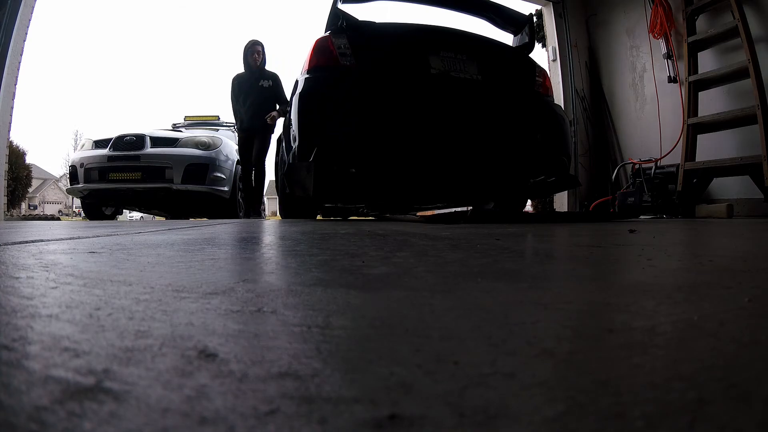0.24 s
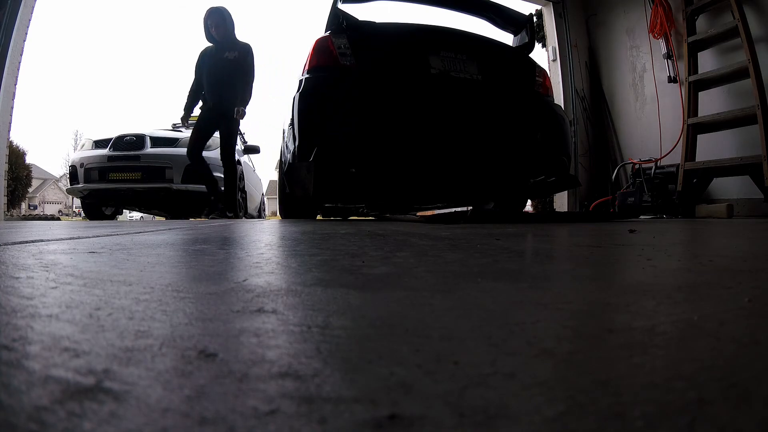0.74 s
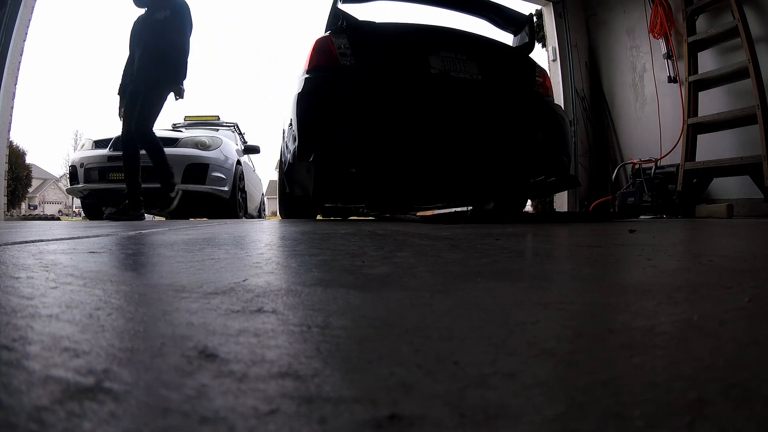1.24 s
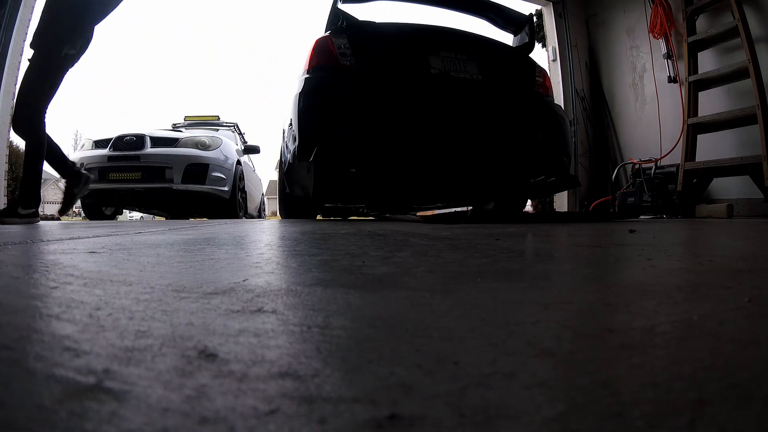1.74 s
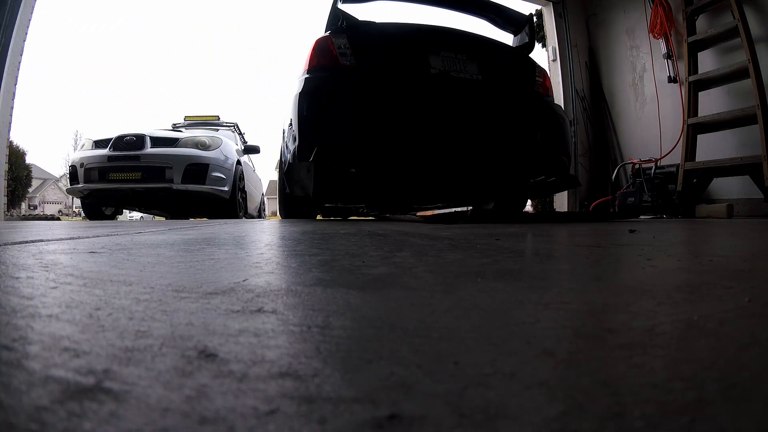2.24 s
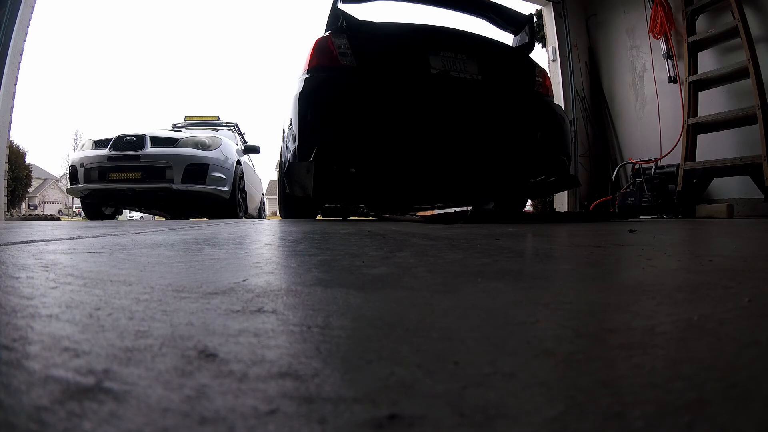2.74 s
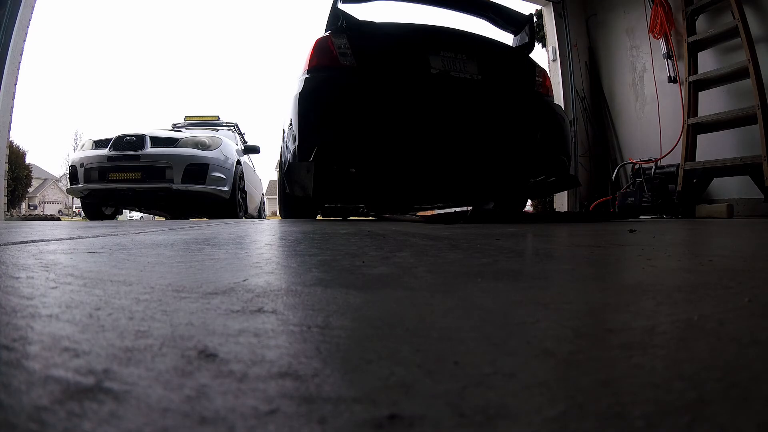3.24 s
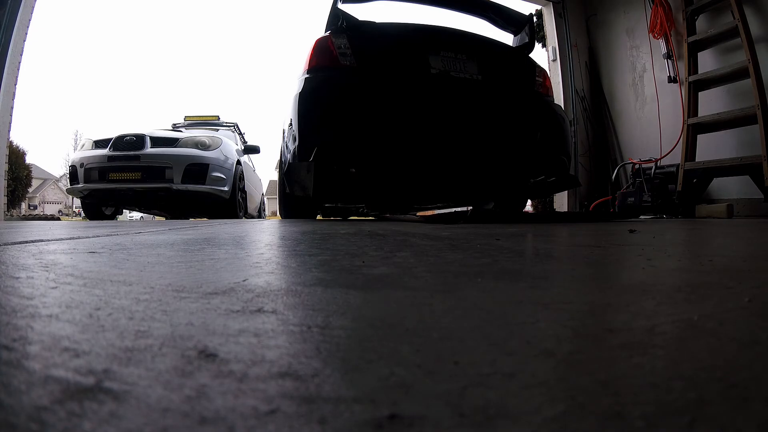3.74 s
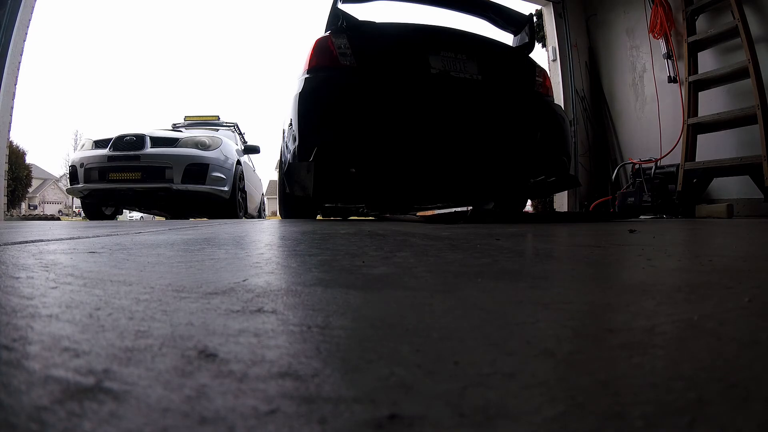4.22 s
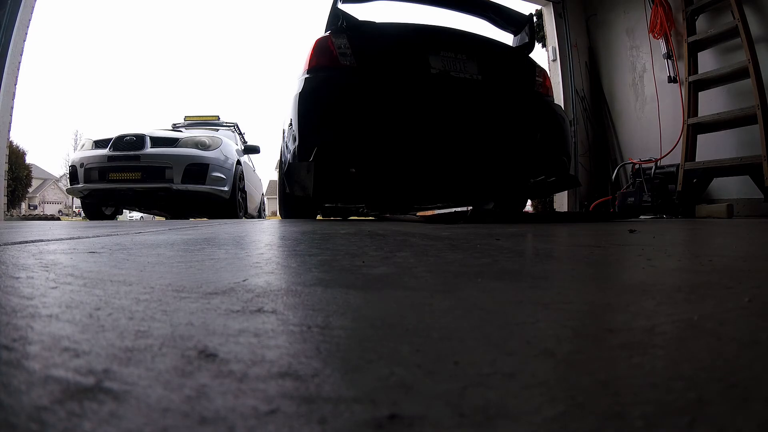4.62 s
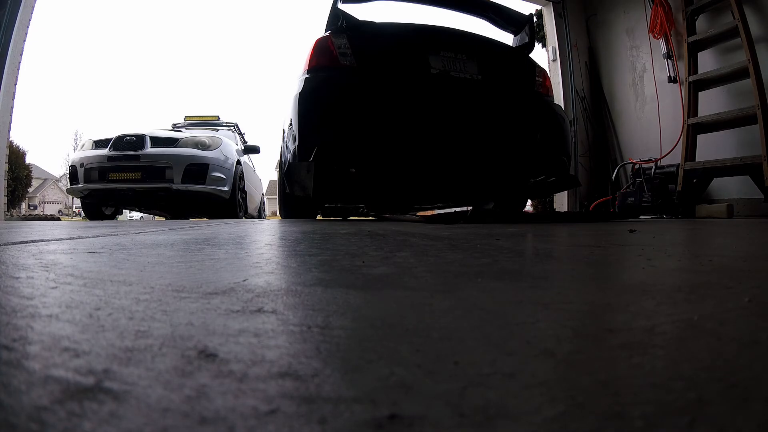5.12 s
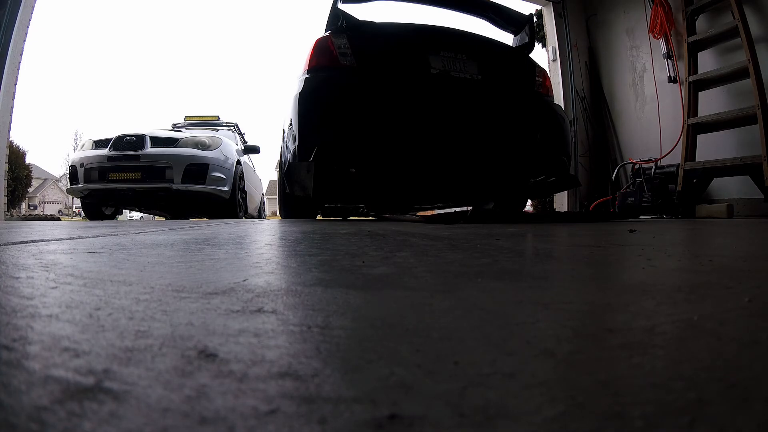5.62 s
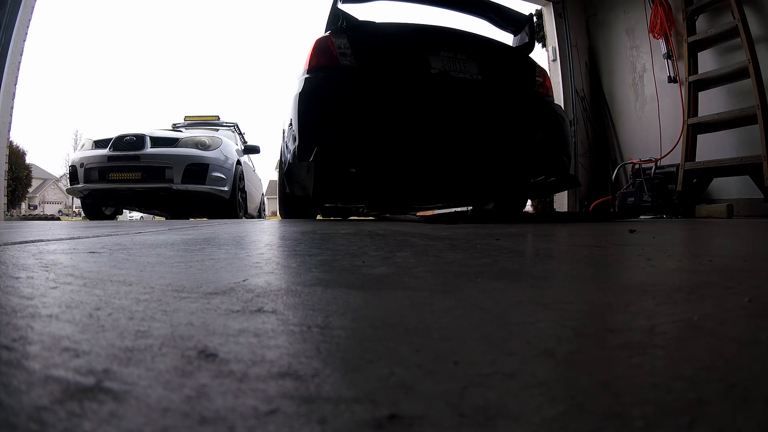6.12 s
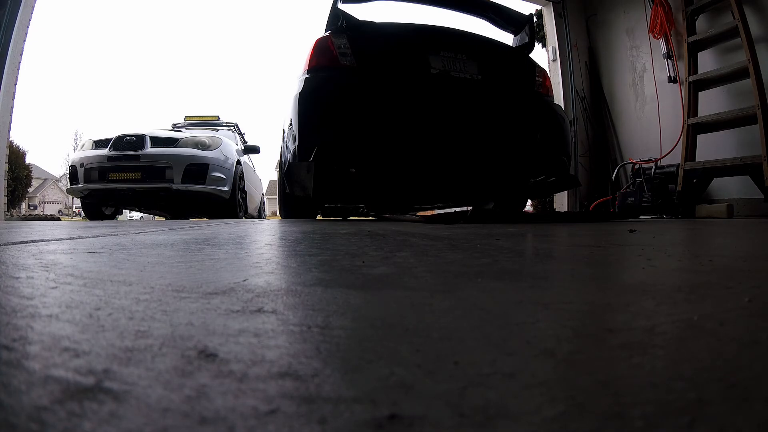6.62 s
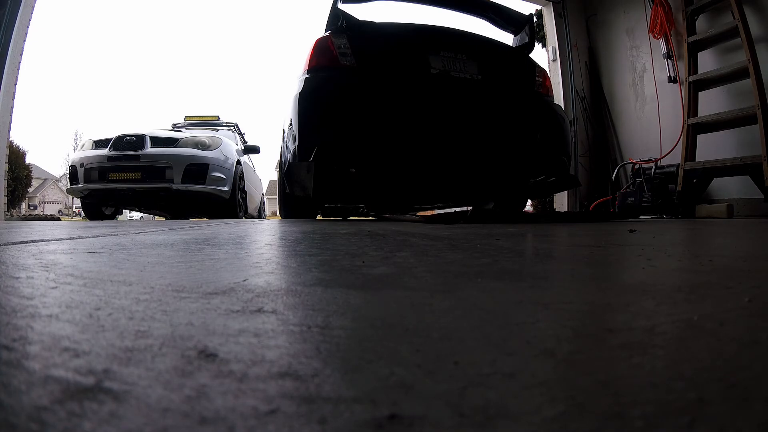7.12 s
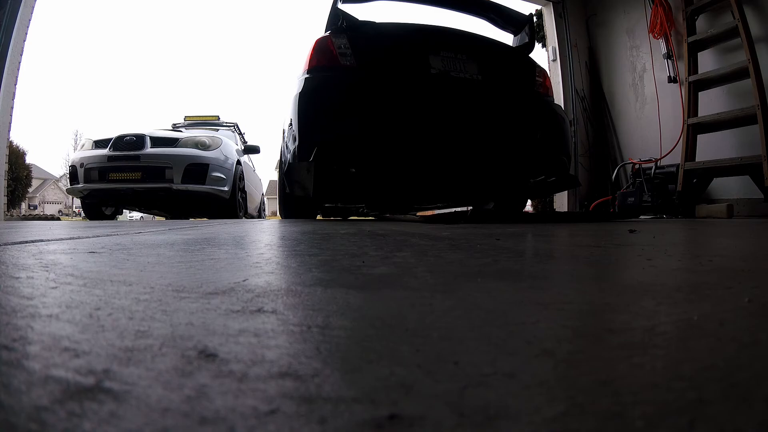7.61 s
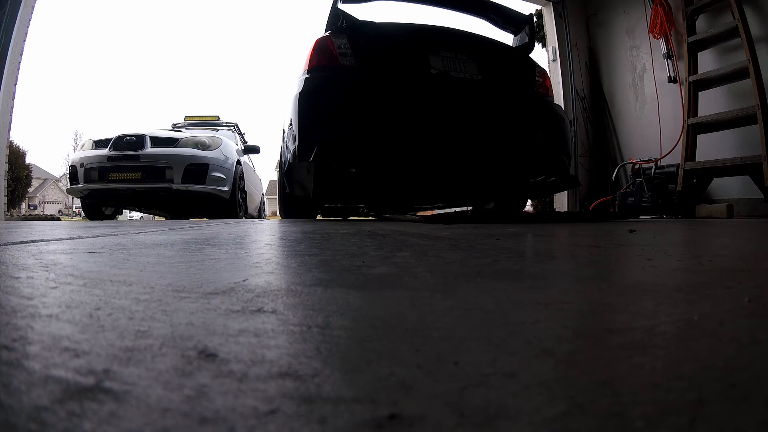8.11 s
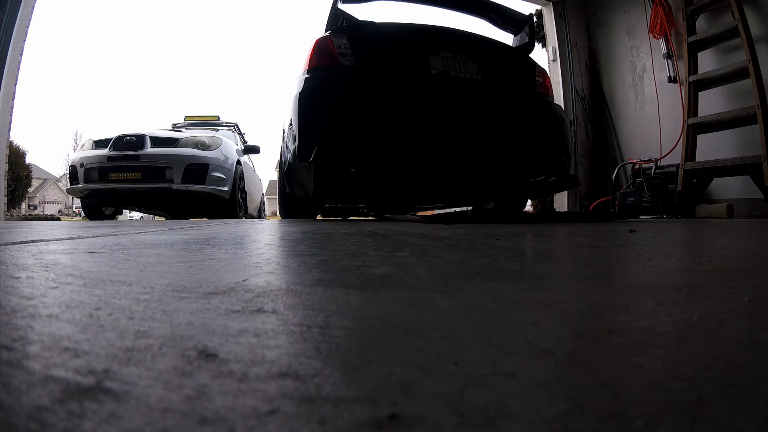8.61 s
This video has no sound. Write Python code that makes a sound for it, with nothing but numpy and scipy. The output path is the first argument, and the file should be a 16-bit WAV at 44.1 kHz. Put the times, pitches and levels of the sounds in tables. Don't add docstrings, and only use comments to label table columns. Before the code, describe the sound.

A turbocharged car idles loudly through an open straight exhaust in a concrete garage, deep, lumpy and booming, with raspy puffs and faint ticking.

```python
import sys
import numpy as np
from scipy import signal
from scipy.fft import rfft, irfft, next_fast_len
from scipy.io import wavfile
from scipy.ndimage import uniform_filter1d, minimum_filter1d

SR = 44100
rng = np.random.default_rng(int(sys.argv[2]) if len(sys.argv) > 2 else 0)


def generate_wav(signal):
    frames = np.transpose(np.atleast_2d(signal))
    scaled = np.clip(frames, -1, 1) * 32767
    pcm = np.round(scaled).astype(np.int16)
    wavfile.write(sys.argv[1], SR, pcm)


def elevation(decibels):
    levels = np.asarray(decibels, float)
    return 10 ** (levels / 20)


N = 390726
RUN_IN = 22050

# (time [s], full engine cycles per second [Hz])
ENGINE_SPEED = [(0.0, 12.798), (0.68, 12.869), (1.36, 12.92), (2.04, 13.016), (2.73, 13.053), (3.41, 13.12),
                (4.09, 13.17), (4.77, 13.188), (5.45, 13.217), (6.13, 13.216), (6.82, 13.263),
                (7.5, 13.375), (8.18, 13.391), (8.86, 13.378)]
FIRING_ORDER = [
    (0.4133, 1.0),
    (0.6637, 1.06),
    (0.8384, 1.0),
    (0.0878, 0.81),
]
# (time [share of the cycle], level [dB])
TAILPIPE_PUFFS = [
    (0.119, 0.5),
    (0.388, -1.5),
    (0.629, -6),
    (0.871, -3.5),
]
# (time [share of the cycle], level [dB])
VALVE_TICKS = [
    (.17, 0),
    (0.429, 0.5),
    (.68, -2),
    (0.929, 3.5),
]

# (frequency [Hz], width [Hz], signed drive under load, just unloaded, warmed up [amplitude])
PIPE_ONE_MODES = [(28.7, 7.0, 0.001, 0.1029, 0.0125), (147.9, 4.0, -0.0686, -0.0603, -0.0177),
                  (257.0, 20.9, 0.2464, 0.1469, 0.1045), (275.9, 4.5, 0.0441, 0.0206, -0.019),
                  (300.4, 4.0, 0.0256, 0.0021, 0.0337), (305.5, 4.7, -0.0338, -0.0655, -0.0131),
                  (310.7, 5.4, -0.0723, -0.0229, -0.0043), (336.2, 4.0, -0.013, 0.212, 0.0103),
                  (363.1, 23.4, -0.0757, -0.0747, -0.0999), (501.3, 8.2, -0.0022, -0.02, -0.0351),
                  (581.2, 4.0, -0.0013, -0.0124, -0.0008), (697.5, 4.1, 0.0104, -0.0076, 0.009),
                  (711.4, 4.3, -0.0038, -0.004, 0.0018), (752.7, 45.9, -0.0232, -0.026, 0.0184)]
# (frequency [Hz], width [Hz], signed drive under load, just unloaded, warmed up [amplitude])
PIPE_TWO_MODES = [(59.6, 5.9, 0.0574, 0.0504, 0.0371), (152.4, 4.0, 0.0014, -0.0798, -0.2115),
                  (162.6, 4.9, 0.18, 0.1956, 0.1105), (198.3, 6.1, -0.0462, -0.0878, -0.019),
                  (219.2, 5.6, 0.0125, 0.0089, 0.0303), (264.7, 6.3, -0.0601, -0.0572, 0.0569),
                  (312.8, 8.7, 0.0209, 0.112, -0.0521), (413.8, 16.5, -0.0774, 0.0245, 0.0526),
                  (456.4, 8.4, 0.0314, 0.006, -0.1104), (466.7, 36.0, 0.1343, -0.0982, -0.1229),
                  (505.5, 8.1, 0.0404, -0.0182, -0.0678), (527.9, 5.6, 0.0348, -0.0102, -0.0003),
                  (575.0, 21.0, -0.0236, 0.1228, -0.0017), (760.6, 12.5, -0.0028, -0.0166, -0.0003)]
# (frequency [Hz], width [Hz], signed drive under load, just unloaded, warmed up [amplitude])
GARAGE_MODES = [(81.4, 4.0, -0.0423, -0.0653, -0.0714), (104.4, 4.2, 0.007, 0.039, -0.0432),
                (163.4, 4.0, -0.0147, 0.0262, 0.0449), (237.5, 7.9, 0.0754, 0.056, -0.0017),
                (320.7, 23.3, 0.1601, 0.0095, -0.0571), (348.5, 5.5, -0.0859, -0.0151, 0.1274),
                (381.0, 7.8, 0.0803, 0.0441, -0.0014), (407.3, 5.7, 0.0039, 0.0165, 0.0106),
                (426.7, 10.2, -0.0462, -0.0371, -0.0062), (447.5, 7.4, -0.0287, -0.0394, 0.0532),
                (619.9, 48.5, -0.0205, -0.012, -0.01), (707.5, 4.0, 0.0032, -0.0196, -0.0218),
                (772.9, 4.0, 0.0056, 0.0025, -0.004), (866.2, 4.4, 0.0021, -0.009, 0.0006)]
# (frequency [Hz], width [Hz], signed drive under load, just unloaded, warmed up [amplitude])
BODY_MODES = [(85.0, 4.0, -0.1472, -0.1716, -0.0871), (141.0, 14.5, 0.3745, 0.3214, 0.2548),
              (168.6, 8.5, -0.0111, 0.0586, -0.0476), (202.2, 4.0, -0.0101, -0.0243, 0.0253),
              (272.6, 17.8, -0.0332, 0.0619, -0.0409), (330.2, 13.5, -0.0468, -0.0327, -0.0691),
              (348.5, 4.0, -0.0123, -0.0185, 0.0041), (351.6, 5.4, 0.0145, 0.002, -0.0309),
              (442.0, 4.2, 0.0101, 0.0699, -0.0089), (532.8, 5.7, 0.0074, -0.0106, -0.0047),
              (567.8, 22.2, -0.0097, 0.0107, 0.0259), (667.0, 11.8, -0.0107, -0.008, -0.0141),
              (677.6, 12.4, 0.0054, 0.0117, 0.0082), (863.1, 7.4, -0.0038, 0.0074, 0.0011)]
# (frequency [Hz], width [Hz], level [dB])
TAILPIPE_MODES = [(581.4, 11, 12), (707, 46, -1), (765, 7.3, 4), (862, 33, -1.5), (1016, 18, 0.5),
                  (1116, 5.3, 4.5), (1308, 65, -4), (1480, 95, -6), (1620, 51, -8.5)]
# (frequency [Hz], width [Hz], level [dB])
HEAD_MODES = [(4753, 58, 6.5), (5100, 150, -7.5), (5460, 220, -7.5), (5700, 150, -7), (6280, 220, -6)]

# (frequency [Hz], level [dB per Hz])
ECHO_SPECTRUM = [(15, -17.5), (26, -7.5), (34, -24.5), (60, -16), (80, -5), (130, 7.5), (300, -1.5),
                 (500, 5.5), (700, -9.5), (1100, -10), (1500, -19), (2200, -29.5)]
# (frequency [Hz], level [dB per Hz])
RUMBLE_SPECTRUM = [(20, -16), (45, -12), (70, -4), (120, 0), (160, 1), (220, -5), (330, -2), (470, -1),
                   (560, -7), (700, -11), (850, -17), (1000, -40)]
# (frequency [Hz], level [dB per Hz])
RASP_SPECTRUM = [(380, -28), (650, 5.5), (825, -13), (1110, -9.5), (1200, -17), (1550, -14.5), (1780, -16),
                 (2600, -35), (3380, -62), (5720, -120)]
# (frequency [Hz], level [dB per Hz])
WHIRR_SPECTRUM = [(1500, -31.5), (2000, -2.5), (2600, -4.5), (3500, -9.5), (4300, -9), (4650, -6.5),
                  (5100, -3.5), (6100, -5.5), (6500, -13), (7200, -16.5), (8300, -18.5), (9500, -21.5),
                  (11200, -27.5), (12000, -43.5)]

# (under load [dB], just unloaded [dB], warmed up [dB])
BOOM_LEVEL = (1, .5, 0)
# (under load [dB], just unloaded [dB], warmed up [dB])
RASP_LEVEL = (-41, -36, -35)
# (under load [dB], just unloaded [dB], warmed up [dB])
HEAD_LEVEL = (-63.5, -54.5, -57)
# (under load [dB], just unloaded [dB], warmed up [dB])
WHIRR_LEVEL = (-56.5, -54.5, -57)

UNLOAD_S, SHIFT_S, WARM_S = 1.36, 0.04, 8.86
WARMING_BEND = 0.6
HUNT_CYCLES = 0.002
BITE_S, SOFT_START_DB, UPPER_HZ = 0.34, -3, 225
UPPER_DB, DAMPED_DB_PER_HZ = -0.02, -0.0327
WAVER_DB, WAVER_CYCLES = 1.3, 3.3


def rms_one(x):
    return x / np.sqrt(np.mean(x ** 2) + 1e-20)


def in_time(rows):
    s, *columns = np.transpose(rows)
    return [np.interp(np.arange(-RUN_IN, N) / SR, s, c) for c in columns]


def by_state(loaded, unloaded, warm):
    s = np.arange(-RUN_IN, N) / SR
    dropped = np.clip((s - UNLOAD_S) / SHIFT_S, 0, 1)
    warming_from = UNLOAD_S + SHIFT_S
    warmth = np.clip((s - warming_from) / (WARM_S - warming_from), 0, 1) ** WARMING_BEND
    return loaded + (unloaded - loaded) * dropped + (warm - unloaded) * warmth


def clicks(cycles, pattern, spread_db):
    out = np.zeros(len(cycles))
    for share, size in pattern:
        at = np.flatnonzero(np.diff(np.floor(cycles - share))) + 1
        vary = np.clip(rng.standard_normal(200), -1.6, 1.6)[:len(at)]
        out[at] += size * elevation(spread_db * vary)
    return out


def bursts(cycles, pattern, spread_db, decay_s, steady):
    r = np.exp(-1 / (np.clip(decay_s, 0.0005, 0.02) * SR))
    hits = clicks(cycles, [(share, elevation(db)) for share, db in pattern], spread_db)
    swell = signal.lfilter([1], [1, -2 * r, r * r], hits)
    return rng.standard_normal(len(cycles)) * (steady + rms_one(swell))


def ring(drive, hz, width):
    r, w = np.exp(-np.pi * width / SR), 2 * np.pi * hz / SR
    return signal.lfilter([0, np.sin(w)], [1, -2 * r * np.cos(w), r * r], drive + 1e-18)


def resonate(noise, modes):
    out = 0
    for k, (hz, width, db) in enumerate(modes):
        out = out + (-1) ** k * elevation(db) * width * ring(noise, hz, width)
    return rms_one(out)


def coloured(x, spectrum):
    size = next_fast_len(len(x))
    hz, db = np.transpose(spectrum)
    bins_hz = np.arange(size // 2 + 1) * SR / size
    gain = elevation(np.interp(np.log(bins_hz + 1), np.log(hz), db, left=-90, right=-90))
    return rms_one(irfft(rfft(x, size) * gain, size)[:len(x)])


def crank():
    rate, = in_time(ENGINE_SPEED)
    cycles = np.cumsum(rate) / SR
    cycles = cycles - cycles[RUN_IN]
    return cycles + HUNT_CYCLES * np.interp(cycles, 2 * np.arange(-5, 65), rng.standard_normal(70))


def boom(cycles):
    one = clicks(cycles, FIRING_ORDER[:2], spread_db=0.6)
    two = clicks(cycles, FIRING_ORDER[2:], spread_db=0.6)
    at = np.flatnonzero(one + two)
    bite_db = in_time([(BITE_S - 0.05, SOFT_START_DB), (BITE_S + 0.05, 0)])[0][at]
    states = np.array([by_state(*share)[at] for share in np.eye(3)])
    rung = [(one, PIPE_ONE_MODES), (two, PIPE_TWO_MODES), (one + two, GARAGE_MODES), (one - two, BODY_MODES)]
    out, drive = 0, np.zeros(len(cycles))
    for pulses, modes in rung:
        for hz, width, *strength in modes:
            waver = np.interp(cycles[at], WAVER_CYCLES * np.arange(-9, 91), rng.standard_normal(100))
            upper_db = UPPER_DB + DAMPED_DB_PER_HZ * width + bite_db + WAVER_DB * waver
            drive[at] = pulses[at] * (strength @ states) * elevation(upper_db * (hz > UPPER_HZ))
            out = out + ring(drive, hz, width)
    out = signal.sosfilt(signal.butter(2, 18, "high", fs=SR, output="sos"), out)
    return signal.sosfilt(signal.butter(4, 1200, fs=SR, output="sos"), out)


def walls(cycles):
    tail = elevation(-60 * np.arange(9000) / SR / 0.25)
    out = 0
    for cylinder in FIRING_ORDER:
        waver = elevation(1.5 * np.interp(cycles / 7, np.arange(-2, 20), rng.standard_normal(22)))
        pulses = waver * clicks(cycles, [cylinder], spread_db=3.06)
        echoes = tail * rng.standard_normal(9000)
        out = out + signal.fftconvolve(pulses, echoes)[:len(cycles)]
    return coloured(out, ECHO_SPECTRUM)


def rumble(cycles):
    return coloured(bursts(cycles, TAILPIPE_PUFFS, spread_db=3.0, decay_s=0.004, steady=1.5), RUMBLE_SPECTRUM)


def rasp(cycles):
    broad = coloured(bursts(cycles, TAILPIPE_PUFFS, spread_db=3.0, decay_s=0.0022, steady=2.2), RASP_SPECTRUM)
    pipe = resonate(bursts(cycles, TAILPIPE_PUFFS, spread_db=3.0, decay_s=0.003, steady=1.3), TAILPIPE_MODES)
    pipe = signal.sosfilt(signal.butter(4, [530, 1750], "band", fs=SR, output="sos"), pipe)
    return elevation(-6) * broad + elevation(-1.5) * pipe


def valves(cycles):
    head = resonate(bursts(cycles, VALVE_TICKS, spread_db=2.6, decay_s=0.0018, steady=0.3), HEAD_MODES)
    return signal.sosfilt(signal.butter(4, [4500, 6500], "band", fs=SR, output="sos"), head)


def whirr(cycles):
    return coloured(bursts(cycles, VALVE_TICKS, spread_db=2.5, decay_s=0.0061, steady=3.0), WHIRR_SPECTRUM)


def scene():
    cycles = crank()
    out = elevation(by_state(*BOOM_LEVEL)) * boom(cycles)
    out = out + elevation(-30) * walls(cycles)
    out = out + elevation(-33) * rumble(cycles)
    out = out + elevation(by_state(*RASP_LEVEL)) * rasp(cycles)
    out = out + elevation(by_state(*HEAD_LEVEL) - 6.0) * valves(cycles)
    out = out + elevation(by_state(*WHIRR_LEVEL)) * whirr(cycles)
    return out[None, RUN_IN:]


def roll_off(x):
    return signal.sosfilt(signal.butter(12, 15300, fs=SR, output="sos"), x)


def record(dry):
    peaks = -minimum_filter1d(-np.abs(dry), 441)
    over = np.clip(peaks / 0.72, 1, None)
    held = dry / uniform_filter1d(over, 441)
    self_noise = elevation(-92) * rng.standard_normal(dry.shape)
    return roll_off(held + self_noise)


dry = scene()
out = record(dry)
generate_wav(out)
```